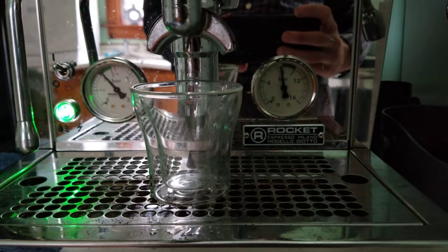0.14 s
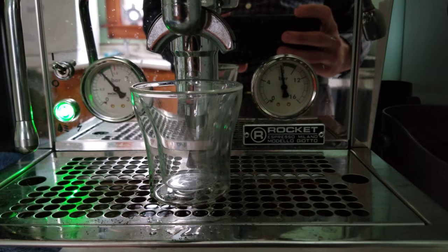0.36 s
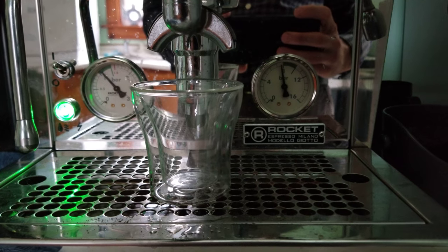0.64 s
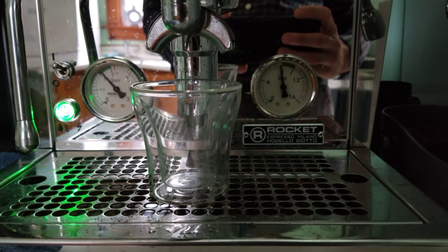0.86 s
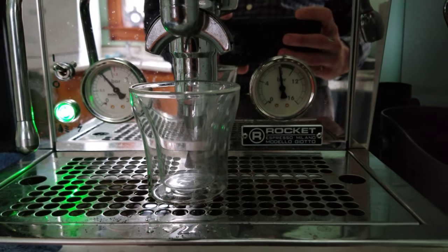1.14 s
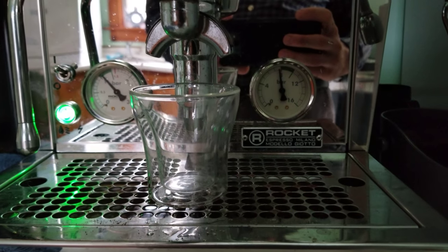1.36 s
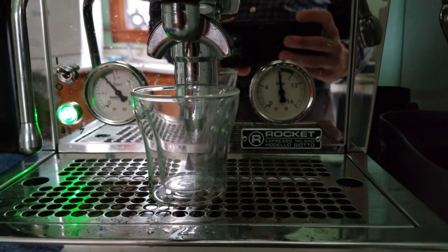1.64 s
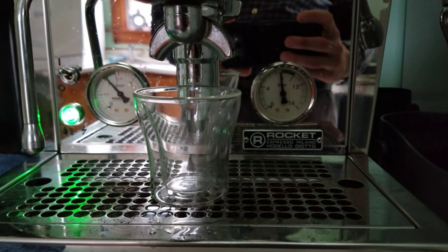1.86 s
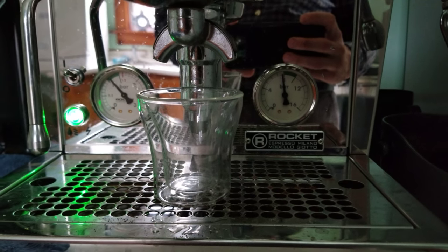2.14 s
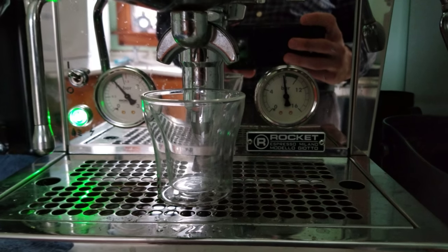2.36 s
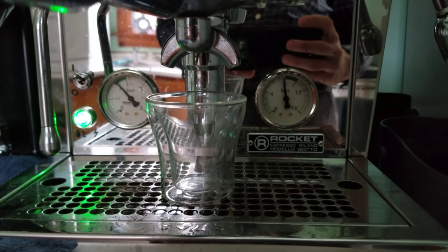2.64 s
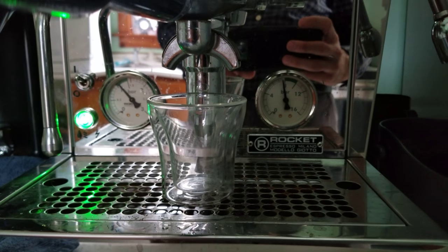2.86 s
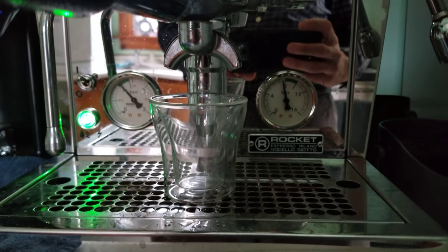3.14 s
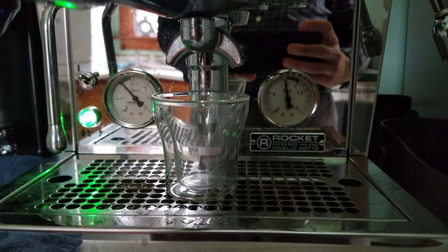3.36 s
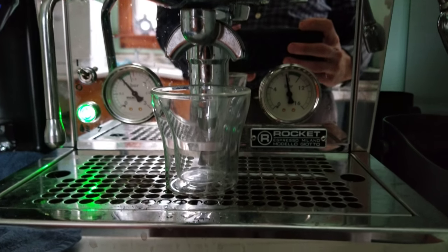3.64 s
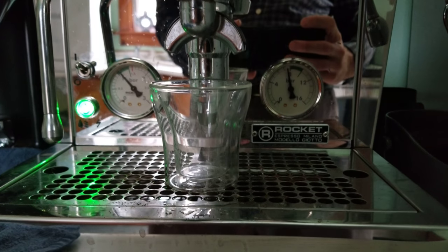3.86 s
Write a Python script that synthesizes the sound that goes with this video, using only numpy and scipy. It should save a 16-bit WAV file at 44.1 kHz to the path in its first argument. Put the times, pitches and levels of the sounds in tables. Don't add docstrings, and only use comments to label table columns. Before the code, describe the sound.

After a brief silence, a vibrating espresso pump fades in: low steady hum, fast buzzing rattle of a steel case, wavering tray drone and soft flow noise, heard close up indoors on a phone.

```python
import sys
import numpy as np
from scipy import signal
from scipy.fft import rfft, irfft, next_fast_len
from scipy.io import wavfile
from scipy.ndimage import uniform_filter1d, map_coordinates

SR = 44100
rng = np.random.default_rng(int(sys.argv[2]) if len(sys.argv) > 2 else 0)


def magnitude_from_level(level_db):
    exponent = np.asarray(level_db, float) / 20
    return 10 ** exponent


def unload_audio(sound):
    columns = np.transpose(np.atleast_2d(sound))
    steps = np.round(np.clip(columns, -1, 1) * 32767)
    wavfile.write(sys.argv[1], SR, steps.astype(np.int16))


N = 176400
TIME = np.arange(N) / SR
SIDES = np.array([[.5], [-.5]])

MAINS_HZ = 60.003

HUM_ORDERS = [2, 3, 4, 5, 6, 7, 8, 10, 14, 17, 29, 79, 105, 106]
# (level [dB rms], left-right [dB], right leads [rad])
HUM_LEVELS = [(-55.5, -3, -0.33), (-46.5, -0.5, -0.33), (-47.5, 1, -0.031), (-49, -2, 0.47),
              (-73.5, -4, 0.95), (-62.5, -1, -1.9), (-61.5, 9.5, -1), (-65, 5, 1.1), (-67.5, 2, 0.2),
              (-68.5, 15, -1.14), (-65.5, 7.5, 1.56), (-78.5, -9, -.8), (-73, -2, -1.4), (-77, -5, .6)]
OPPOSED_ORDERS = [2, 6, 8, 14]
# (time [s], level [dB])
PISTON_LOAD = [
    (.35, 0),
    (1.7, 0.5),
    (2.37, 0.5),
    (2.7, -4.5),
    (2.92, -3.5),
    (3.01, -7),
    (3.12, 0),
    (4, 0),
]
STROKE_TAPS = [
    (0.372, 0.85),
    (1, 0.8),
    (0.11, 0.89),
]
# (frequency [Hz], level [dB per Hz])
RATTLE_COLOUR = [(200, -120), (350, 5), (1500, -13.5), (2300, -20.5), (6500, -15), (8500, -19),
                 (10300, -47), (13000, -45)]
# (frequency [Hz], width [Hz], gain [dB], left-right [dB])
PANEL_RINGS = [(547, 21, 4.5, 5), (639, 14, -1, 0.5), (980, 60, 10, 9), (1273, 60, 7.5, -5),
               (1765, 118, 16.5, -1), (2715, 136, 13.5, -1.5), (3060, 140, 6, 7), (3680, 390, 15, -3),
               (4080, 110, 1, -11), (5400, 210, 4, 2), (6620, 550, 1, -8.5), (7200, 200, -4, -9),
               (7710, 160, 8, -7.5), (9750, 305, 14.5, -15)]
# (frequency [Hz], likeness [-1..1])
PORT_LIKENESS = [(60, 0.99), (180, 0.94), (550, 0.55), (1650, 0.032), (4970, -0.044), (15000, 0.018)]
# (frequency [Hz], left-right [dB])
CASE_LEAN = [(60, -4), (130, -6), (290, -8.5), (640, -3.5), (1410, 2.5), (3100, -2), (6820, -2.5),
             (15000, 1)]
# (time [s], level [dB])
TRAY_SWELLS = [(.35, -55), (.55, -50.5), (.75, -49), (.95, -51), (1.25, -52.5), (1.42, -47), (1.63, -63),
               (1.85, -51.5), (2.1, -46.5), (2.32, -60), (2.5, -43.5), (2.77, -50), (2.95, -53),
               (3.15, -52.5), (3.35, -58), (3.6, -56), (3.85, -51), (4, -63)]
SIDE_TONE_HZ = [59.2, 60, 266.2, 2784, 2843, 1836.5, 1700]
# (level [dB rms], left-right [dB], unsteadiness [dB])
SIDE_TONE_LEVELS = [(-66, 1, 2), (-77.5, -4, 4), (-61.5, -0.5, 2.5), (-72, -6, 1.5), (-75.5, -5, 1),
                    (-75.5, 2, 1.5), (-73, 12, 0.5)]
# (frequency [Hz], level [dB per Hz])
WATER_COLOUR = [(20, -24), (80, -14), (240, 0.5), (400, -9.5), (1500, -29.5), (2320, -34.5), (6500, -35.5),
                (10300, -57.5)]
# (frequency [Hz], level [dB per Hz])
HISS_COLOUR = [(3000, -37), (10300, -5), (11200, -3), (12500, 0), (14000, -2), (15600, 0.5)]
# (frequency [Hz], gain [dB])
UNSETTLED_COLOUR = [(50, -3), (250, -1.5), (1000, -2), (1400, -5), (1750, -3.5), (2300, -6), (2800, -0.5),
                    (6300, 0)]


def unit(x):
    return x / np.sqrt(np.mean(x ** 2) + 1e-20)


def along(points, hz):
    point_hz, value = np.transpose(points)
    return np.interp(np.log(hz + 1), np.log(point_hz + 1), value)


def automation(rows):
    seconds, value = np.transpose(rows)
    return np.interp(TIME, seconds, value)


def wobble(rate):
    coarse = np.arange(0, N + 64, 64)
    knots = rng.standard_normal(200)
    drift = map_coordinates(knots, [coarse * min(rate, 40) / SR])
    return np.interp(np.arange(N), coarse, drift)


def filtered(x, response):
    size = next_fast_len(N + 8192)
    spectrum = rfft(x, size) * response(np.fft.rfftfreq(size, 1 / SR))
    return irfft(spectrum, size)[..., :N]


def tone(phase, db, lean_db, lead):
    return np.sqrt(2) * magnitude_from_level(db + SIDES * lean_db) * np.cos(phase - SIDES * lead)


def case(pair, spectrum):
    def blend(hz):
        angle = np.arccos(np.clip(along(PORT_LIKENESS, hz), -1, 1)) / 2
        return [np.cos(angle), np.sin(angle)]

    def colour(hz):
        rings = 0
        for centre, width, db, lean_db in PANEL_RINGS:
            resonance = hz * width / np.hypot(centre * centre - hz * hz, hz * width)
            rings = rings + magnitude_from_level(db + SIDES * lean_db) * resonance
        return magnitude_from_level(along(spectrum, hz) + SIDES * along(CASE_LEAN, hz)) * (1 + rings)

    shared, different = filtered(pair, blend)
    ports = np.array([shared + different, shared - different])
    return unit(filtered(ports, colour))


def hum(cycle, load_db):
    knock_s, knock_rad = .0072, -.85
    low_share, full_order = .25, 5
    out = 0
    for order, (db, lean_db, lead) in zip(HUM_ORDERS, HUM_LEVELS):
        share = low_share + (1 - low_share) * np.exp(-(order - full_order) ** 2)
        sway_db = .6 * order ** .2
        phase = 2 * np.pi * order * (cycle - knock_s * MAINS_HZ) + knock_rad
        phase = phase + np.pi * (order in OPPOSED_ORDERS)
        phase = phase + 0.033 * sway_db * wobble(3.63)
        level_db = db + share * load_db + sway_db * (wobble(3.98) + 0.66 * wobble(17))
        out = out + tone(phase, level_db, lean_db, lead)
    return out


def rattle(cycle, load_db):
    memory_cycles, kept = 19.6, 0.31
    tap_width = 0.019
    size = round(SR / MAINS_HZ)
    count = int(N / SR * MAINS_HZ) + 3
    slow = rng.standard_normal((2, count, size))
    slow = uniform_filter1d(slow, int(memory_cycles), 1)
    slow = unit(uniform_filter1d(slow, int(memory_cycles / 2), 1))
    same = rng.standard_normal((2, 1, size))
    strokes = np.sqrt(kept) * same + np.sqrt(1 - kept) * slow
    part = np.arange(size) / size
    taps = 1
    for at, strength in STROKE_TAPS:
        taps = taps + strength * np.exp((np.cos(2 * np.pi * (part - at)) - 1) / (2 * np.pi * tap_width) ** 2)
    pair = np.array([map_coordinates(side.ravel(), [(cycle + 1) * size]) for side in strokes * taps])
    level_db = -57.5 + .4 * load_db + .6 * wobble(12)
    return magnitude_from_level(level_db) * case(pair, RATTLE_COLOUR)


def tray():
    phase = 2 * np.pi * 212.3 * TIME + 0.58 * wobble(7)
    level_db = automation(TRAY_SWELLS) + 1.26 * wobble(20)
    return tone(phase, level_db, 0, 0.077)


def side_tones():
    out = 0
    for tone_hz, (db, lean_db, sway_db) in zip(SIDE_TONE_HZ, SIDE_TONE_LEVELS):
        phase = 2 * np.pi * tone_hz * TIME + 0.22 * sway_db * wobble(6)
        out = out + tone(phase, db + sway_db * wobble(9), lean_db, .2)
    return out


def water(load_db):
    cells = signal.stft(rng.standard_normal((2, N)), nperseg=512)[2]
    patches = uniform_filter1d(rng.standard_normal(cells.shape[1:]), 6, 0)
    patches = uniform_filter1d(patches, 14, 1)
    patchy_db = 1
    pair = signal.istft(cells * magnitude_from_level(patchy_db * unit(patches)), nperseg=512)[1][:, :N]
    level_db = -49 + 0.23 * load_db + 0.25 * wobble(3.63)
    return magnitude_from_level(level_db) * case(pair, WATER_COLOUR)


def scene():
    wander_s = .00004
    cycle = MAINS_HZ * (TIME + wander_s * wobble(1.406))
    load_db = automation(PISTON_LOAD)
    pump = hum(cycle, load_db) + rattle(cycle, load_db)
    return pump + tray() + side_tones() + water(load_db)


def roll_off(x):
    return signal.sosfilt(signal.butter(12, 15900, fs=SR, output="sos"), x)


def record(dry):
    settle_s, settle_rise_s = .57, 0.027
    fade_start_s, fade_s, fade_bend = .339, 0.51, 0.86
    top_hz = 15730
    hiss = filtered(rng.standard_normal((2, N)), lambda hz: magnitude_from_level(along(HISS_COLOUR, hz)))
    heard = dry + magnitude_from_level(-74.5) * unit(hiss)
    settled = .5 + .5 * np.tanh((TIME - settle_s) / settle_rise_s)
    unsettled = filtered(heard, lambda hz: magnitude_from_level(along(UNSETTLED_COLOUR, hz)))
    heard = settled * heard + (1 - settled) * unsettled
    fade = np.clip((TIME - fade_start_s) / fade_s, 0, 1) ** fade_bend
    mix = filtered(heard, lambda hz: hz < top_hz) * fade
    return roll_off(mix)


dry = scene()
out = record(dry)
unload_audio(out)
```